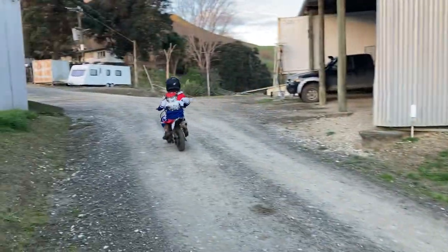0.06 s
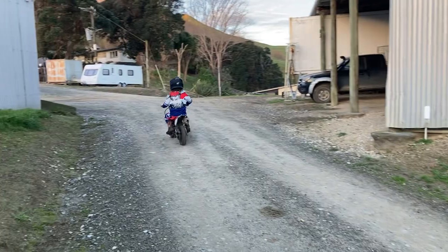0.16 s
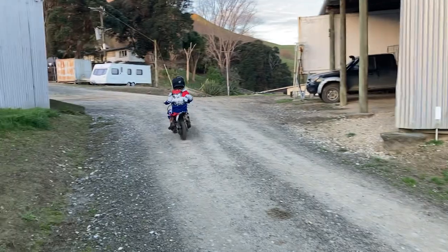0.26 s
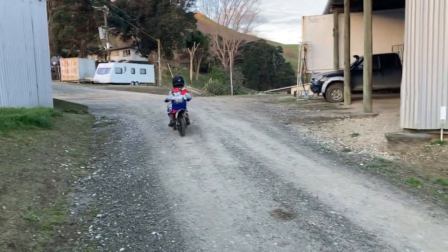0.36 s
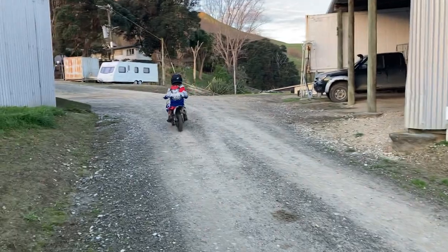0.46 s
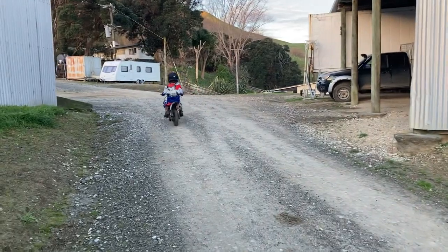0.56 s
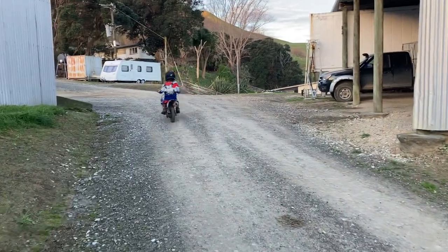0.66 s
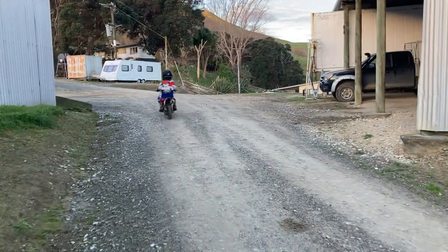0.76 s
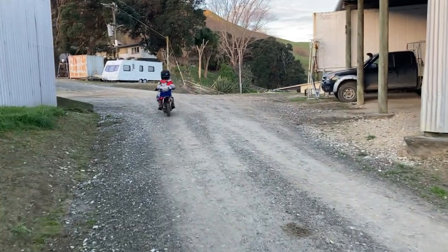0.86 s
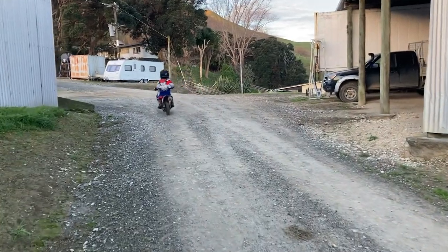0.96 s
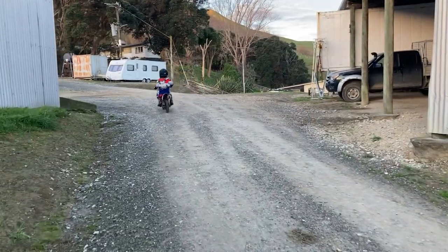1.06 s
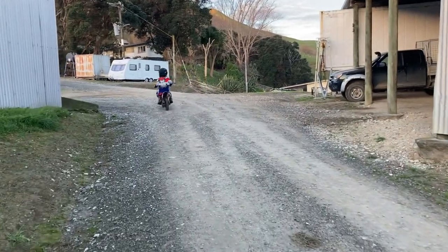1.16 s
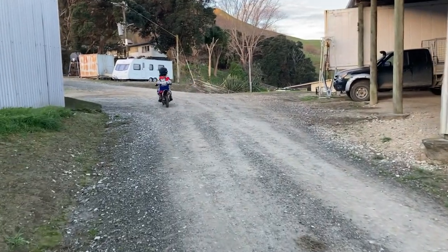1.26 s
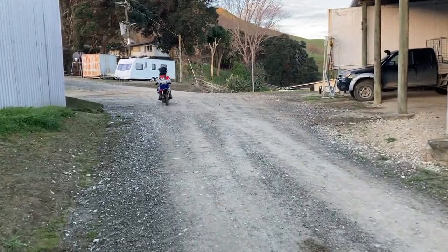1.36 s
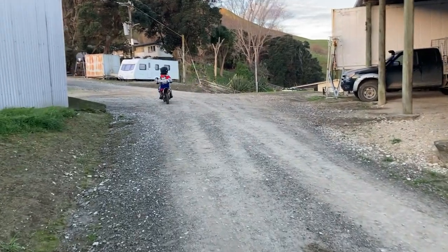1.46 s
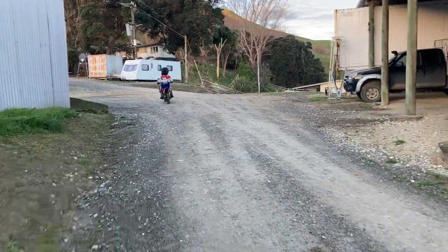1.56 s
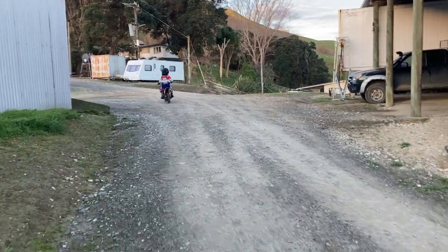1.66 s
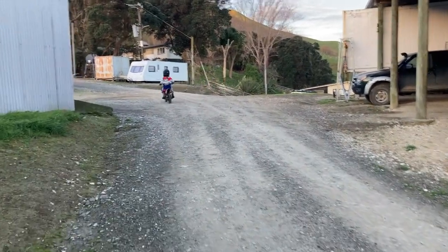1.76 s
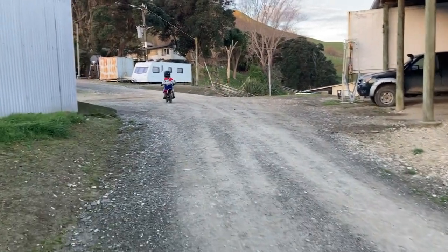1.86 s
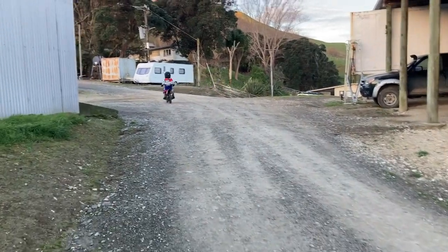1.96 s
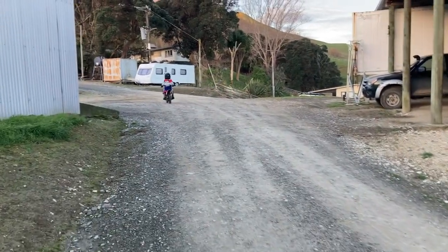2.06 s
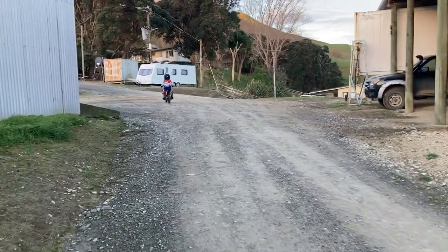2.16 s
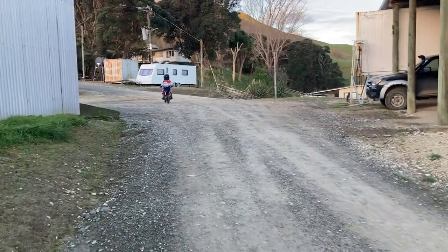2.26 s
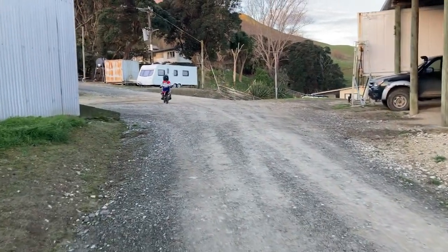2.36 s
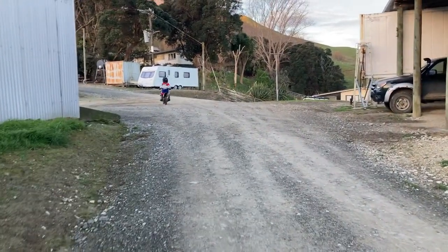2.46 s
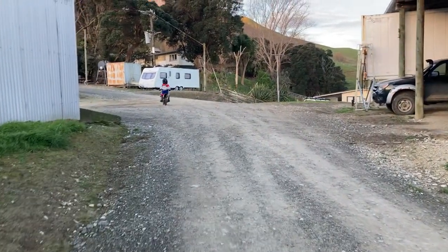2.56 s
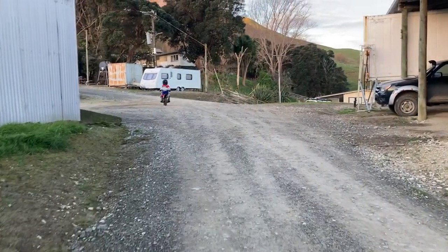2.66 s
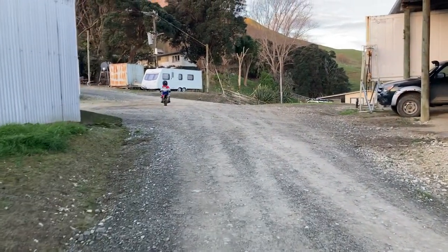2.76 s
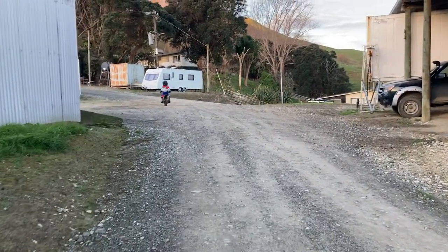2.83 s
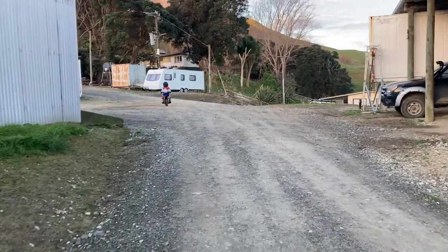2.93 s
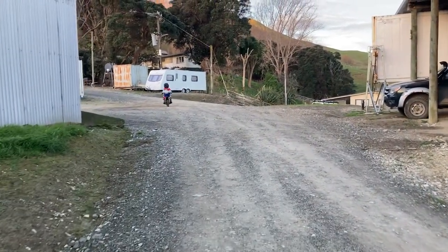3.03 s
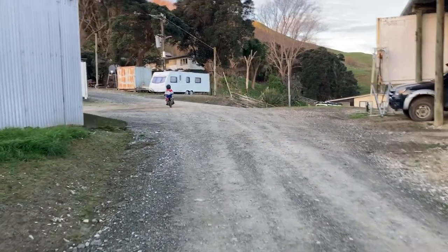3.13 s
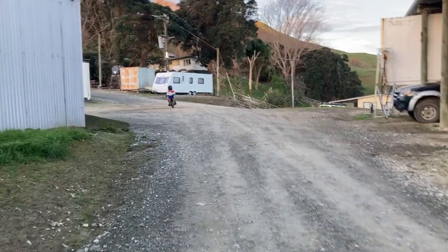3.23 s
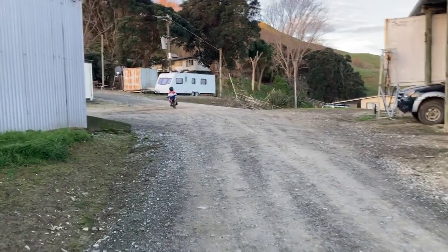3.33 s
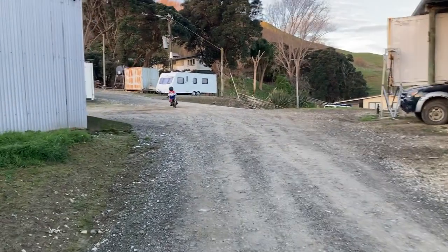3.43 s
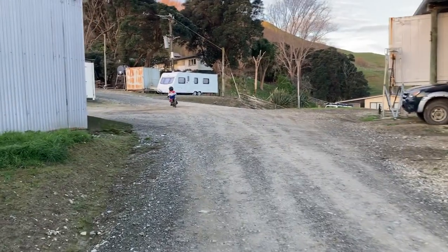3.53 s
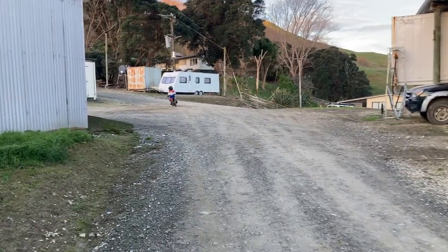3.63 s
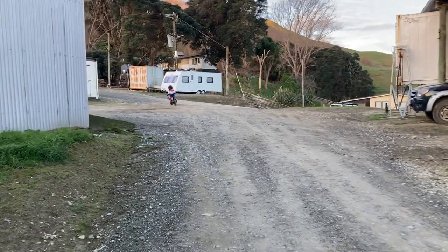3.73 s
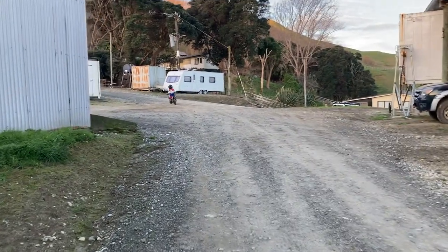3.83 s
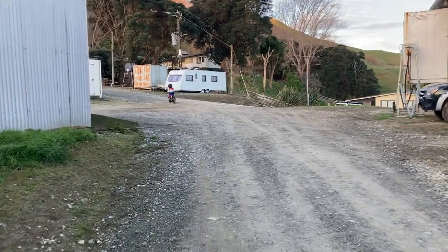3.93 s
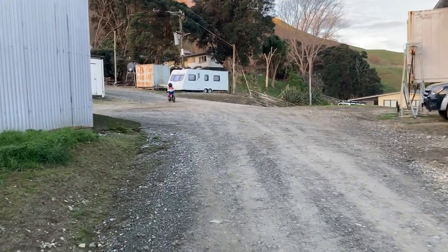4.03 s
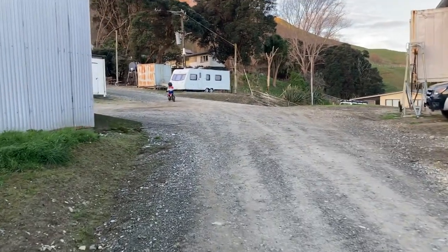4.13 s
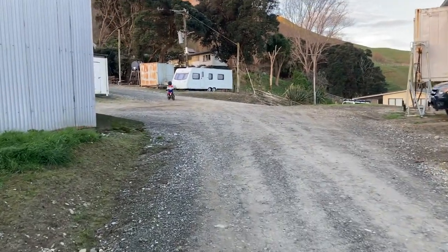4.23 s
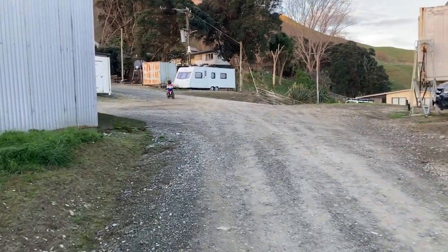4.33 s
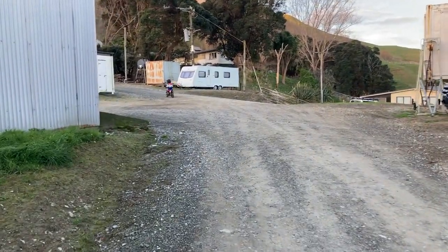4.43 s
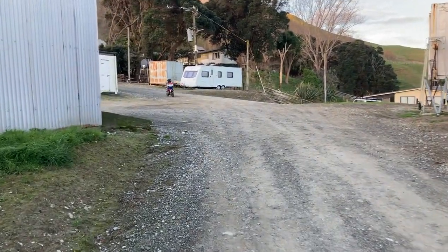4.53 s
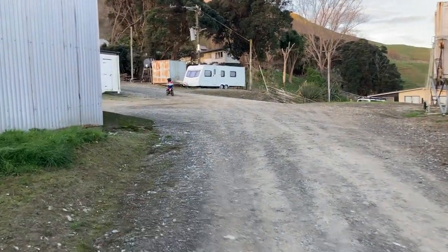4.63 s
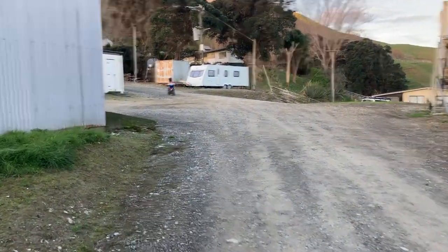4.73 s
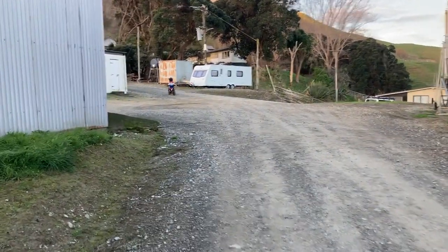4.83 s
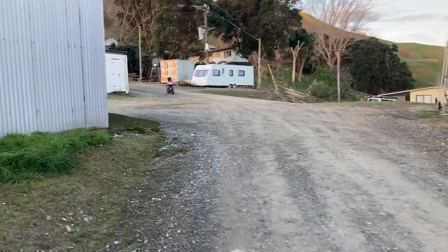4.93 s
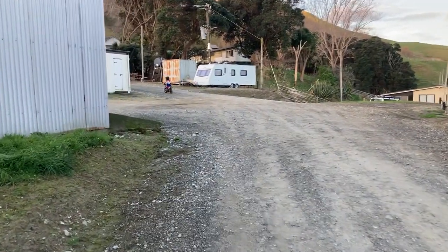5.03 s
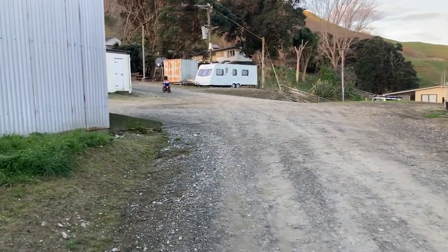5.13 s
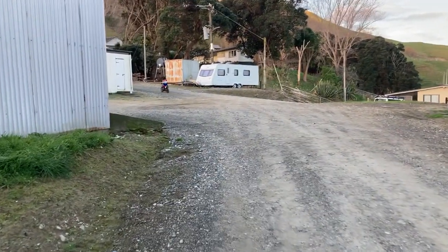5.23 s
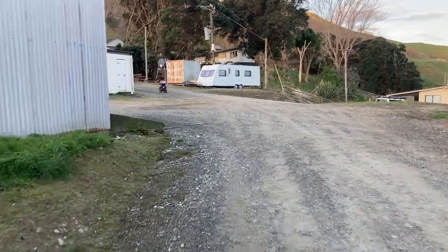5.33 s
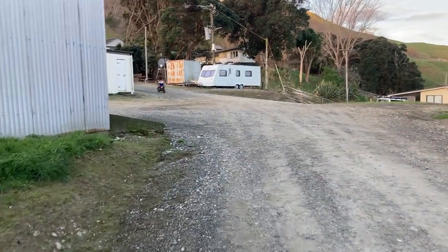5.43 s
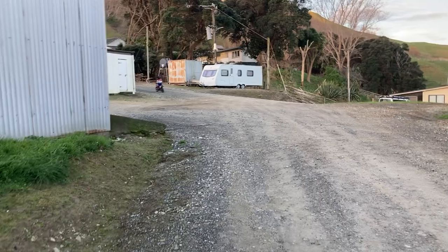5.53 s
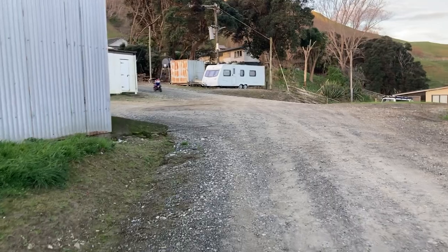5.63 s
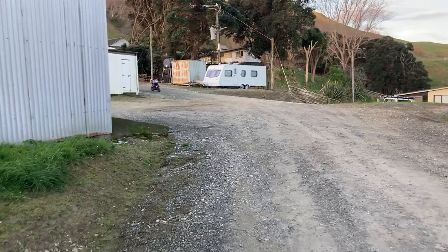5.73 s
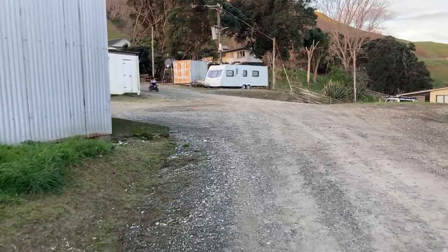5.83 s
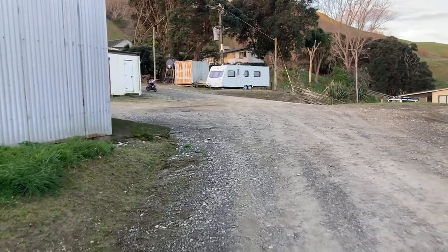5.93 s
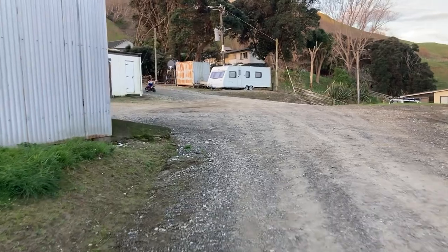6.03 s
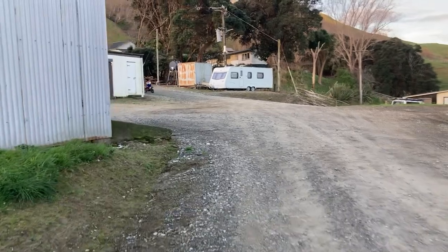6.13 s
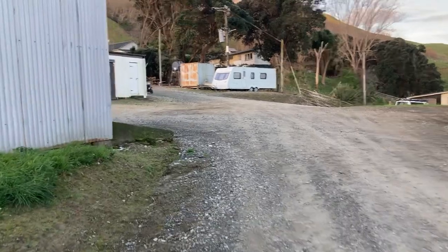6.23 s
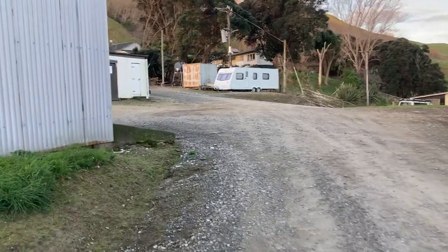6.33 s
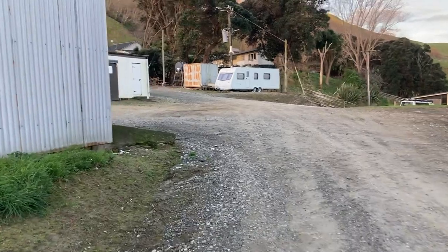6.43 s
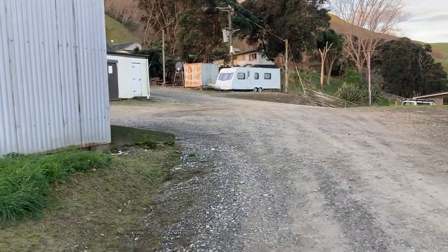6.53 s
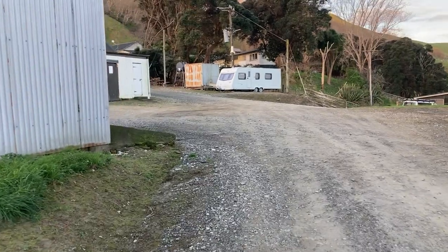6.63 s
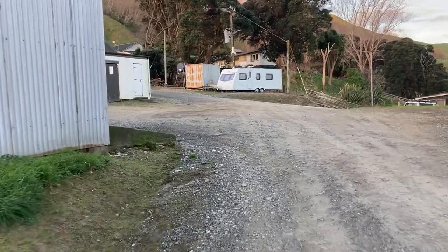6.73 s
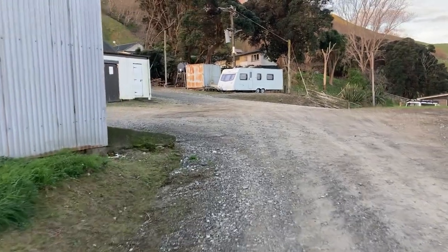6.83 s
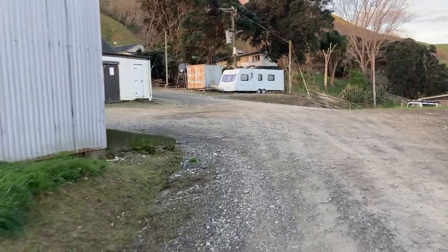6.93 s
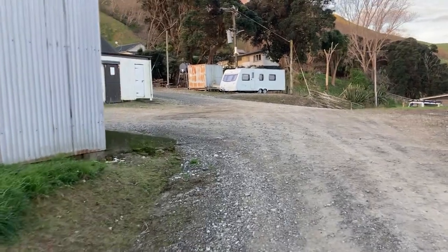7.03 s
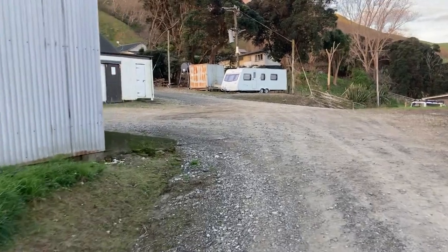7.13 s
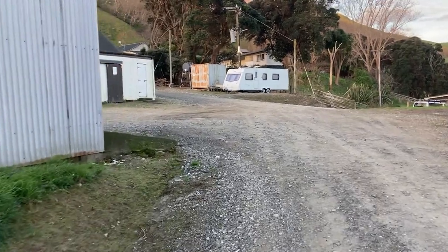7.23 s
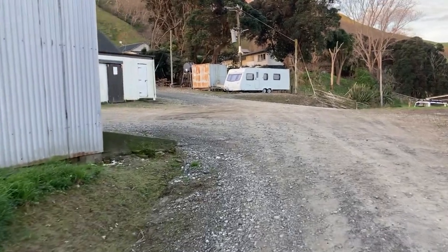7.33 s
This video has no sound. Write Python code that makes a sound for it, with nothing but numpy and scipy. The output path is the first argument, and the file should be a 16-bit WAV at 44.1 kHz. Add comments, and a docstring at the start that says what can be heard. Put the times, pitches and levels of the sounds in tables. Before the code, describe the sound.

Buzzy little motorbike burbles and honks away over crunching gravel, its raspy revs getting slower and fainter, leaving soft outdoor rumble.

```python
"""A child's small four-stroke dirt bike rides away along a gravel farm track, throttled in short bursts.
Sine orders of the firing rate make the drone; bent pipe tones honk, and filtered noise puffs tick and rasp.
Uneven firings ring the silencer in a burble, and separate putts and cracks stand out.
The tyres crunch in dense noise grains, sheds answer with delays and decaying noise tails,
and a soft outdoor rumble of shaped noise lies underneath."""
import sys
import numpy as np
from scipy import signal
from scipy.fft import rfft, irfft, next_fast_len
from scipy.io import wavfile
from scipy.ndimage import map_coordinates

SR = 44100
rng = np.random.default_rng(int(sys.argv[2]) if len(sys.argv) > 2 else 0)


def pcm_store(signal):
    """Save signal as 16-bit PCM."""
    levels = np.round(np.clip(np.atleast_2d(signal), -1, 1) * 32767)
    wavfile.write(sys.argv[1], SR, levels.astype(np.int16).T)


N = 325451

# Engine speed. Each row: time in seconds, firings per second.
ENGINE_SPEED = [(0.0, 49.82), (0.14, 48.68), (0.44, 46.24), (0.6, 49.39), (0.92, 48.09), (1.01, 46.5),
                (1.29, 43.14), (1.52, 47.75), (1.7, 45.67), (2.03, 42.05), (2.2, 45.31), (2.82, 46.96),
                (3.0, 49.11), (3.19, 48.98), (3.47, 44.57), (3.66, 44.06), (3.89, 48.74), (4.05, 46.14),
                (4.2, 44.2), (4.42, 39.7), (4.58, 44.6), (4.7, 43.16), (4.9, 39.11), (5.1, 41.73),
                (5.3, 41.6), (5.48, 38.3), (5.67, 39.9), (5.9, 36.02), (6.14, 33.7), (6.27, 35.9),
                (6.42, 36), (6.62, 33.3), (6.84, 30.7), (7.1, 34.1), (7.38, 33.9)]
CRUISE_RATE = 43.14  # firings per s at which the honk gets no boost or cut for speed
# Twists of the throttle, and one swell of the pipe while coasting (opening 0).
# Each row: starts in seconds, ends in seconds, opening 0-1, then added levels:
# drone in dB, honk in dB, tick in dB, and while coasting afterwards drone in dB, honk in dB.
ENGINE_BURSTS = [(-0.2, 0.135, 0.05, -7.5, 11.5, 6, -3, 6.5), (0.466, 0.968, 0.7, -1.5, 6.5, 14, 2.5, 0.5),
                 (1.301, 1.718, 0.93, 1.5, 2, 18.5, 1.5, -2), (2.027, 3.209, 0.8, 3.5, 8, 16, 2, -0.5),
                 (3.521, 3.674, 0, 5, 4, -14.5, 0, 2), (3.694, 4, 0.9, 5, 6.5, 12.5, 4.5, -3),
                 (4.424, 4.691, 1, 7.5, 7.5, 14.5, 3, 3), (4.932, 5.314, 0.95, 5.5, 5.5, 17, 1, 0.5),
                 (5.509, 5.699, 0.92, 0, 6.5, 13, 2, -3), (6.171, 6.42, 0.3, 1, 0, 8, 2, -2)]
OPEN_S, SHUT_S = .008, .012  # how fast the engine answers as a burst starts and ends (s)
SURGE_S, SURGE_DB = 0.12, -1  # upper orders, bark and tick give way after each start: fade time, amount
LULL_S, LULL_DB = .04, -5  # the note dips briefly as the throttle shuts
SWELL_S, SWELL_DB = .1, -5  # the honk builds up after each start
# Unevenness of the note (0-1): coasting, under load, and what is added by the end of the ride.
ROUGH_COASTING, ROUGH_LOADED, ROUGH_FAR = .19, .04, .12
START_M, RIDE_M_PER_S = 3.81, 2.88  # the bike's first distance and its pace
HIDDEN_S, HIDING_S = 6.46, 0.017  # when and how fast it slips behind a shed (s)

# What the silencer lets out of the low orders, under load and coasting. Each row: frequency in Hz, level in dB.
NOTE_LOADED = [(70, -52.5), (82, -17.5), (92, -14.5), (125, -33), (165, -28.5), (185, -18), (210, -22.5),
               (230, -21.5), (250, -26.5), (300, -34)]
NOTE_COASTING = [(70, -33), (90, -20), (115, -25.5), (140, -21.5), (160, -10), (180, -14), (210, -27),
                 (240, -28.5), (290, -39.5)]
# Added level of the second order, the bass boom; of the third; of the fourth; of the fifth and sixth.
# Each row: time in seconds, level in dB.
BOOM = [(0, -1.5), (0.4, 1.5), (0.6, 0), (0.78, 8.5), (0.94, 9), (1.02, 4.5), (1.2, -9.5), (1.35, 1.5),
        (2.95, 4), (3.06, -5.5), (3.19, 2), (3.27, 10.5), (3.7, -4), (5.3, -9), (5.9, 8), (6.7, 17),
        (7.38, 11)]
THIRD_ORDER = [(0, 3), (.5, 5.5), (1.2, 5), (2.3, 2), (2.9, 7), (3.9, 2), (4.3, 2), (5.0, 7), (5.4, 8),
               (5.85, 7.5), (6.3, -3), (6.62, 16), (6.85, -2), (7.38, -5.5)]
FOURTH_ORDER = [(0, 4), (.2, -0.5), (.4, 4), (.44, -6.5), (.7, -1), (1.3, 2.5), (3.1, 0), (3.3, 8),
                (3.5, -2), (4.1, 2.5), (4.35, 0.5), (4.8, 0.5), (5.4, 1.5), (5.8, 0), (6.3, -16),
                (7.38, -1.5)]
UPPER_ORDERS = [(0, 14.5), (.13, -4), (.3, 5.5), (.4, 5.5), (.44, -2), (.53, 7.5), (.7, -6), (.92, -2.5),
                (1.15, -4.5), (1.35, 3), (1.6, -1), (1.9, 0.5), (2.2, 1.5), (2.9, 1), (3.4, 1.5), (4.4, -3),
                (5.15, 1.5), (5.7, 4), (5.9, -9), (6.3, 7), (6.55, -3), (7.38, -1.5)]
# The shed wall beside the track. Each row: time in seconds, echo delay in ms, share of the direct sound 0-1.
WALL_ECHO = [(0, 12.6, .55), (.35, 10.8, .45), (.75, 10.3, .6), (.92, 10.2, .35), (1.02, 10.2, 0)]
# The silencer's resonance. Each row: frequency in Hz, width in Hz, level in dB.
SILENCER_RING = [(157, 114, 0)]
# Hard firings, each a separate putt. Each row: time in seconds, level in dB.
PUTTS = [(4.079, -16), (4.306, -14.5), (4.353, -17), (4.401, -15.5), (5.338, -18.5), (5.391, -19.5),
         (5.417, -18), (5.443, -16.5), (5.723, -20), (5.749, -18), (5.775, -21.5), (5.937, -20),
         (5.969, -20), (5.996, -21.5), (6.107, -18.5), (6.143, -28), (6.221, -20), (6.624, -25),
         (7.061, -22), (7.371, -25.5)]
PUTT_HZ, PUTT_S = 145.5, 0.0065  # a putt's mean pitch and half its length

BLOW_JITTER = .009  # how far a blow strays under full load (share of a cycle); twice that when coasting
# Spectrum of the bark. Each row: frequency in Hz, relative level in dB per Hz.
BARK_SPECTRUM = [(200, -47.5), (280, -5), (330, 10), (390, 9), (470, 17), (530, 1), (590, 8.5), (680, 2.5),
                 (780, -1.5), (900, -14.5), (1050, -34), (1800, -25.5), (3200, -16.5), (6000, -60.5)]
# Metal ring of the engine. Each row: frequency in Hz, width in Hz, level in dB.
CASING_RING = [(2570, 40, 2), (4660, 260, -12)]
# Pipe resonances that colour the rasp. Each row: frequency in Hz, width in Hz, level in dB.
PIPE_RESONANCES = [(1270, 320, -5), (1500, 150, -5.5), (2620, 65, -21.5)]
# The pipe cracks early in the ride. Each row: time in seconds, level in dB before the direct-to-echo balance.
PIPE_CRACKS = [(0.0255, -23), (0.046, -22), (0.087, -30.5), (0.107, -24), (0.127, -29)]
CRACK_HZ, CRACK_S = 1410, 0.0016  # a crack's mean pitch and half its length
# Spectra of the tick and the valve gear. Each row: frequency in Hz, relative level in dB per Hz.
TICK_SPECTRUM = [(1000, -49), (2500, -18), (3500, -12.5), (4700, -0.5), (6000, 0), (7500, -15), (9000, 0),
                 (10000, 5.5), (10800, 6.5), (11800, -17), (13500, -4.5), (15500, -8)]
VALVE_SPECTRUM = [(1000, -33.5), (1900, -0.5), (2400, -4), (3200, -7.5), (4300, -2.5), (5200, -2.5),
                  (7000, -25), (12000, -24.5)]

# Spectrum of crunch and snaps. Each row: frequency in Hz, relative level in dB per Hz.
GRAVEL_SPECTRUM = [(200, -37), (450, -3), (750, 11.5), (1000, 2.5), (1600, 0.5), (2300, -1), (3400, -0.5),
                   (4200, -8), (4700, -5.5), (5800, -3.5), (7400, -8), (9800, -6.5), (12000, -5.5),
                   (15500, -13.5)]
# Patches of loose gravel. Each row: middle in seconds, added crunch in dB.
LOOSE_PATCHES = [(0.18, 2.5), (0.629, 9.5), (0.852, 7), (1.541, 6.5), (3.92, -0.5), (4.63, 6.5), (6.3, 4.5)]
LOOSE_S = 0.11  # half the time a patch takes to cross
# Stones that snap under a tyre. Each row: time in seconds, relative strength in dB.
STONE_SNAPS = [(0.6252, -32.5), (1.519, -31.5), (1.5277, -37.5)]

# Decay of the echo from sheds and trees. Each row: frequency in Hz, time to fall 60 dB in seconds.
YARD_DECAY = [(150, 0.13), (1300, 0.23), (4000, 0.061), (12000, 0.0034)]
# Phase by which the left microphone port leads. Each row: frequency in Hz, phase in radians.
PORT_LEAD = [(0, 0), (500, .1), (1400, .7), (3000, 1.1), (4400, 2.2), (5400, 3.1), (6200, 2.4), (7200, 0),
             (9000, -3.1), (9600, -3.7), (11000, -6), (11900, -6.5), (13000, -8.9), (14000, -9.7),
             (15600, -12.5)]
# Sideways balance of the direct sound. Each row: frequency in Hz, left minus right in dB.
SIDE_LEAN = [(90, -1.5), (170, 1.34), (500, 0.1), (1300, 3.5), (2500, 3.5), (5000, -1)]

# Spectrum of the open air. Each row: frequency in Hz, relative level in dB per Hz.
AIR_SPECTRUM = [(20, -44), (35, -13), (50, -5), (70, -3.5), (120, 1), (250, -4), (400, -14), (700, -20.5),
                (1200, -28), (2000, -35), (3500, -41), (6000, -53.5), (15000, -74.5)]
# Mean level of the rumble. Each row: time in seconds, level in dB.
RUMBLE_LEVEL = [(0, -23.5), (3, -33.5), (5, -34), (6.2, -39.5), (7.38, -38)]
# How alike left and right are in the open air. Each row: frequency in Hz, likeness 0-1.
AIR_LIKENESS = [(60, 0.94), (250, 0.91), (500, 0.27), (1000, 0.023), (4000, 0.036)]
FAR_AIR_DB = -36.5  # the steady wash of the open air above the rumble
TOP_HZ = 15900  # band limit


def crank(rate):
    """Add up the firing rate into engine cycles, whole at each exhaust blow."""
    first_blow = .42  # in cycles
    return np.cumsum(rate) / SR - first_blow


def throttle():
    """Load (0-1), and the dB that each burst and the coasting after it add to drone, honk and tick."""
    load, drone_db, honk_db, tick_db = np.zeros((4, N))
    for starts, ends, opening, drones, honks, ticks, drones_after, honks_after in ENGINE_BURSTS:
        started, ended = step(starts, OPEN_S), step(ends, SHUT_S)
        held = started * (1 - ended)
        load += opening * held
        tick_db += ticks * held
        # each burst replaces the level left by the one before
        drone_db = drone_db * (1 - started) + drones * held + drones_after * ended
        honk_db = honk_db * (1 - started) + honks * held + honks_after * ended
    return np.clip(load, 0, 1), drone_db, honk_db, tick_db


def drone(cycle, rate, load, burst_db):
    """Low exhaust orders as sines with their answer from the wall, and the burble of uneven firings."""
    rough = unevenness(load)
    reach_db = burst_db + lull() + away(doubling_db=8.5, hidden_db=5.0)

    def note(hz):
        return load * amp(along(NOTE_LOADED, hz)) + (1 - load) * amp(along(NOTE_COASTING, hz))

    boom_db, = curves(BOOM)
    third_db, = curves(THIRD_ORDER)
    fourth_db, = curves(FOURTH_ORDER)
    upper_db = curves(UPPER_ORDERS)[0] + surge()
    orders_db = [boom_db, third_db, fourth_db, upper_db, upper_db]
    levels = [amp(reach_db + db) * note(order * rate) for order, db in enumerate(orders_db, 2)]
    wall_ms, wall_share = curves(WALL_ECHO)
    late_cycles = rate * wall_ms / 1000

    tone = amp(-27) * levels[0] * np.sin(2 * np.pi * cycle)  # the firing rate itself is weak
    for order, level in enumerate(levels, 2):
        # changing paths shift each order's phase, the more so far away, and its strength
        drift = rough * np.linspace(.3, 1, N) * (1.2 * wobble(3) + .35 * wobble(18))
        flutter_db = rough * (2.5 * wobble(22) + 5 * wobble(7))
        phase = 2 * np.pi * order * cycle + drift + np.pi / 4
        answer = wall_share * np.sin(phase - 2 * np.pi * order * late_cycles)
        tone += level * amp(flutter_db) * np.sqrt(2) * (np.sin(phase) + answer)

    # firings that are stronger or weaker than the mean ring the silencer between the orders
    surplus = pulses(cycle, offset=0, scatter_db=6) * rng.uniform(-1.96, 1, N)
    ring = unit(filtered(surplus, lambda f: resonances(SILENCER_RING, f) ** 2))
    burble = amp(-2.5) * rough * np.linalg.norm(levels[1:], axis=0) * ring
    return with_putts(amp(-1) * tone), burble


def with_putts(note):
    """Each hard firing, a short low tone burst, takes the place of the ordinary note."""
    t = np.arange(N) / SR
    gap = np.min([np.abs(t - s) for s, _ in PUTTS], axis=0)
    room = 1 - np.exp(-(gap / (2 * PUTT_S)) ** 4)
    return note * room + blips(PUTTS, PUTT_HZ, PUTT_S)


def unevenness(load):
    """How far the note strays: steadiest under load, rougher when coasting or far off."""
    far = np.linspace(0, 1, N) ** 2
    return np.clip(ROUGH_COASTING * (1 - load) + ROUGH_LOADED * load + ROUGH_FAR * far, 0, 1)


def lull():
    """Dip in dB as each wide throttle opening ends, between driven and coasting firings."""
    wide_shuts = [shuts for _, shuts, opening, *_ in ENGINE_BURSTS if opening > .5]
    return LULL_DB * sum(step(shuts, OPEN_S) - step(shuts + LULL_S, OPEN_S / 2) for shuts in wide_shuts)


def after_starts(lasts):
    """A curve that jumps up at the start of each burst and dies away."""
    t = np.arange(N) / SR
    return sum(step(starts, OPEN_S) * np.exp(-np.abs(t - starts) / lasts) for starts, *_ in ENGINE_BURSTS)


def surge():
    """Small level change in dB of upper orders, bark and tick just after each burst starts."""
    return SURGE_DB * after_starts(SURGE_S)


def swell():
    """The dB that the honk still lacks just after each burst starts."""
    return SWELL_DB * after_starts(SWELL_S)


def exhaust(cycle, rate, load, burst_honk_db, burst_tick_db):
    """Each cycle gives a sharp tick, then a honk from the pipe, then the bark of the outflow."""
    wall_boost_db = 4 * curves(WALL_ECHO)[1] * load
    bark_db = -38.5 + 5 * load + surge() + wall_boost_db + away(doubling_db=5.5, hidden_db=4.0)
    speed_db = 0.47 * (rate - CRUISE_RATE)
    honk_db = -52.5 + burst_honk_db + swell() + speed_db + away(doubling_db=1.25, hidden_db=23.5)
    tick_db = -57.5 + burst_tick_db + 2 * surge() + away(doubling_db=9.0, hidden_db=13.0)

    blow = pulses(cycle + BLOW_JITTER * (2 - load) * wobble(45), offset=0, scatter_db=1.6)
    bark = coloured(unit(blow) + .08 * puffs(blow, life=.012), BARK_SPECTRUM)
    bark += 0.7 * (receding(bark, corner_hz=366) - bark)  # its upper orders partly fade with distance
    casing = unit(filtered(puffs(blow, life=0.049), lambda f: resonances(CASING_RING, f)))
    bark += amp(-19) * np.linspace(1, 0, N) * casing

    rasp_puffs = puffs(pulses(cycle, offset=.6, scatter_db=0), life=0.02)
    rasp = unit(filtered(rasp_puffs, lambda f: resonances(PIPE_RESONANCES, f)))
    # the pipe breaks into rasp early in the ride, and more when coasting or far off
    broken = np.clip(.14 + 1.6 * unevenness(load) + .45 * (1 - step(2.05, .15)), 0, .95)
    pipe = np.sqrt(1 - broken ** 2) * honk(cycle, rate) + broken * rasp
    cracked_pipe = amp(honk_db) * pipe + blips(PIPE_CRACKS, CRACK_HZ, CRACK_S)

    spit = pulses(cycle + .025 * wobble(45), offset=.565, scatter_db=3)
    tick = puffs(spit, life=.0007) + .09 * puffs(spit, life=.008)
    ticking = amp(tick_db) * coloured(tick, TICK_SPECTRUM) + valves(cycle)
    return amp(bark_db) * bark, cracked_pipe, ticking


def honk(cycle, rate):
    """Once a cycle the gas flow blows a short pipe tone that swells, sags in pitch and dies; no two are alike."""
    stroke, share = np.divmod(cycle + .56, 1)
    size, slip, early, sharp, length = rng.standard_normal((N // 100, 5))[stroke.astype(int)].T
    t = share / rate  # seconds into the stroke
    age = np.maximum(t - .0006 - .0005 * early, 0) / (.00145 * np.exp(.12 * length))
    envelope = amp(1.1 * size) * age ** 4 * np.exp(-age)
    rest_hz = 1110 * (rate / rate.mean()) ** 0.33  # faster flow blows it sharper
    sag_hz, settle_s = 470, .0064
    phase = 2 * np.pi * (rest_hz * t + sag_hz * settle_s * (1 - np.exp(-t / settle_s)))
    phase += .3 * slip + 2 * np.pi * 22 * sharp * (t - settle_s)  # each stroke's own phase and pitch
    return unit(envelope * (np.sin(phase) + amp(-22) * np.sin(2 * phase)))


def valves(cycle):
    """The valve gear clicks twice a cycle in tiny noise puffs that weaken with distance."""
    clicks = pulses(cycle, offset=.565, scatter_db=3) + .6 * pulses(cycle, offset=.11, scatter_db=3)
    level_db = -47 + away(doubling_db=11, hidden_db=10)
    return amp(level_db) * coloured(puffs(clicks, life=.0009), VALVE_SPECTRUM)


def tyres():
    """Dense noise grains of gravel under the wheels, and a few stones that snap aside."""
    t = np.arange(N) / SR
    loose_db = sum(db * np.exp(-((t - s) / LOOSE_S) ** 2) for s, db in LOOSE_PATCHES)
    crunch_db = -44 + loose_db + away(doubling_db=7.0, hidden_db=11.0)
    struck = rng.random(N) < 900 / SR  # 900 grains a second on average
    grains = struck * amp(4.8 * rng.exponential(size=N).clip(0, 4))
    bed = puffs(grains, life=0.0033) + 0.76 * rng.standard_normal(N)
    crunch = receding(coloured(bed, GRAVEL_SPECTRUM), corner_hz=5970)
    snaps = np.zeros(N)
    for s, db in STONE_SNAPS:
        snaps[round(s * SR)] = amp(db)
    snap = coloured(puffs(snaps, life=.002), GRAVEL_SPECTRUM)
    snap *= amp(4) * snaps.max() / np.abs(snap).max()  # highest peak 4 dB over the strongest table row
    return amp(crunch_db + wobble(13)) * crunch + snap


def away(doubling_db, hidden_db):
    """Level change in dB: a loss for each doubling of the distance, and another behind the shed."""
    metres = START_M + RIDE_M_PER_S * np.arange(N) / SR
    return -doubling_db * np.log2(metres / START_M) - hidden_db * step(HIDDEN_S, HIDING_S)


def receding(x, corner_hz):
    """The top of x fades as the bike rides away."""
    dull = filtered(x, lambda hz: 1 / (1 + (hz / corner_hz) ** 4))
    return x + np.linspace(0, 1, N) * (dull - x)


def yard(x):
    """Sheds and trees scatter the sound in noise tails, different for each side and stretch of track."""
    count = 8
    wet = np.zeros((2, N))
    for k in range(count):
        hz, t, z = signal.stft(rng.standard_normal((2, SR // 2)), SR, nperseg=256)
        decay = amp(-60 * t / along(YARD_DECAY, hz)[:, None])
        tail = signal.istft(z * decay, SR, nperseg=256)[1]
        stretch = np.sqrt(np.clip(1 - np.abs(np.linspace(0, count - 1, N) - k), 0, 1))
        wet += signal.oaconvolve((x * stretch)[None], tail / np.linalg.norm(tail[0]), axes=1)[:, :N]
    return wet


def open_air():
    """A soft outdoor rumble of wavering noise, alike on both sides in the bass, under a steady wash."""
    rumble_db, = curves(RUMBLE_LEVEL)
    a, b = (coloured(rng.standard_normal(N), AIR_SPECTRUM) for _ in range(2))

    def turn(hz):
        return np.arccos(np.clip(along(AIR_LIKENESS, hz), -1, 1)) / 2

    mid = filtered(a, lambda hz: np.cos(turn(hz)))
    side = filtered(b, lambda hz: np.sin(turn(hz)))
    air = np.array([mid + side, mid - side])
    low = filtered(air, lambda hz: 1 / (1 + (hz / 230) ** 4))
    return amp(rumble_db + 1.3 * wobble(2.0)) * low + amp(FAR_AIR_DB) * (air - low)


def pulses(cycle, offset, scatter_db):
    """One pulse of random size in each engine cycle, at the given share of the cycle."""
    at = np.flatnonzero(np.diff(np.floor(cycle - offset)) > 0)
    train = np.zeros(N)
    train[at] = amp(scatter_db * rng.standard_normal(N // 100)[:len(at)])
    return train


def puffs(train, life):
    """Each pulse releases a puff of noise that decays with a time constant of life seconds; rms 1."""
    envelope = signal.lfilter([1], [1, -np.exp(-1 / (life * SR))], train)
    return unit(envelope * rng.standard_normal(N))


def blips(rows, hz, half_s):
    """Short bell-shaped bursts of a tone at (s, dB), each a little different in pitch."""
    t = np.arange(N) / SR
    out = np.zeros(N)
    for (s, db), detune in zip(rows, rng.normal(0, .05, len(rows))):
        near = np.abs(t - s) < 4 * half_s
        u = t[near] - s
        bell = amp(db) * np.exp(-(u / half_s) ** 2)
        out[near] += bell * np.sin(2 * np.pi * hz * (1 + detune) * u + np.pi / 4)
    return out


def resonances(modes, f):
    """Complex response of (Hz, width, dB) resonances, alternating in sign."""
    return sum((-1) ** k * amp(db) * 1j * f * w / (c * c - f * f + 1j * f * w)
               for k, (c, w, db) in enumerate(modes))


def coloured(x, spectrum):
    """x through a causal (minimum-phase) filter with the given spectrum, at rms 1."""
    size = 8192
    cepstrum = irfft(np.log(amp(along(spectrum, np.fft.rfftfreq(size, 1 / SR)))))
    cepstrum[1:size // 2] *= 2  # fold the cepstrum so that nothing sounds ahead of time
    cepstrum[size // 2 + 1:] = 0
    impulse = irfft(np.exp(rfft(cepstrum)))
    return unit(signal.fftconvolve(x, impulse)[:N])


def filtered(x, response):
    """x times a complex response of frequency."""
    m = next_fast_len(N + SR // 2)
    return irfft(rfft(x, m) * response(np.fft.rfftfreq(m, 1 / SR)), m)[..., :N]


def wobble(rate):
    """A smooth random curve, rate knots a second."""
    knots = rng.standard_normal(int(N * rate / SR) + 4)
    return map_coordinates(knots, [np.arange(N) * rate / SR])


def step(at, lasts):
    """A smooth rise from 0 to 1 around a moment, both in seconds."""
    return .5 + .5 * np.tanh((np.arange(N) / SR - at) / lasts)


def curves(rows):
    """One value per sample for each column after the time."""
    s, *cols = np.transpose(rows)
    return [np.interp(np.arange(N) / SR, s, c) for c in cols]


def along(points, hz):
    """Read (Hz, value) points on a log frequency axis."""
    f, v = np.transpose(points)
    return np.interp(np.log(hz + 1), np.log(f + 1), v)


def unit(x):
    """Scale to rms 1."""
    return x / np.sqrt(np.mean(x ** 2) + 1e-20)


def amp(db):
    """Decibels to gain."""
    return 10 ** (np.asarray(db) / 20)


def scene():
    """The bike reaches two microphone ports; its echo grows as it rides away over the open air."""
    rate, = curves(ENGINE_SPEED)
    load, drone_db, honk_db, tick_db = throttle()
    cycle = crank(rate)
    tone, burble = drone(cycle, rate, load, drone_db)
    bark, pipe, tick = exhaust(cycle, rate, load, honk_db, tick_db)
    crunch = tyres()
    wet = np.linspace(.3, .75, N)
    direct = tone + burble + tick + np.sqrt(1 - wet ** 2) * (bark + pipe + crunch)

    def lead(hz):
        return np.exp(.5j * np.outer([1, -1], np.interp(hz, *np.transpose(PORT_LEAD))))

    def lean(hz):
        return amp(np.outer([.5, -.5], along(SIDE_LEAN, hz)))

    engine = amp(-7) * bark + amp(-4) * pipe + amp(-12) * tick
    echo = yard(wet * (engine + crunch + amp(2) * burble))
    # long waves reach both ports alike
    echo += filtered(echo[::-1] - echo, lambda hz: .5 / (1 + (hz / 330) ** 4))
    return filtered(direct, lambda hz: lead(hz) * lean(hz)) + echo + open_air()


def record(dry):
    """Keep nothing at or above the band limit."""
    return filtered(dry, lambda hz: hz < TOP_HZ)


dry = scene()
out = record(dry)
pcm_store(out)
```